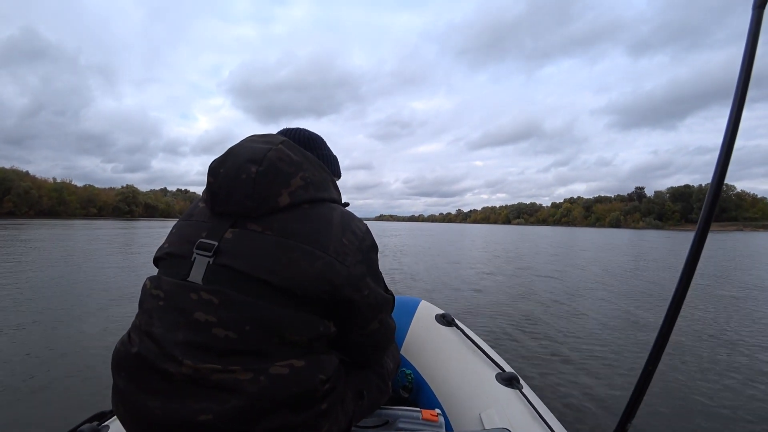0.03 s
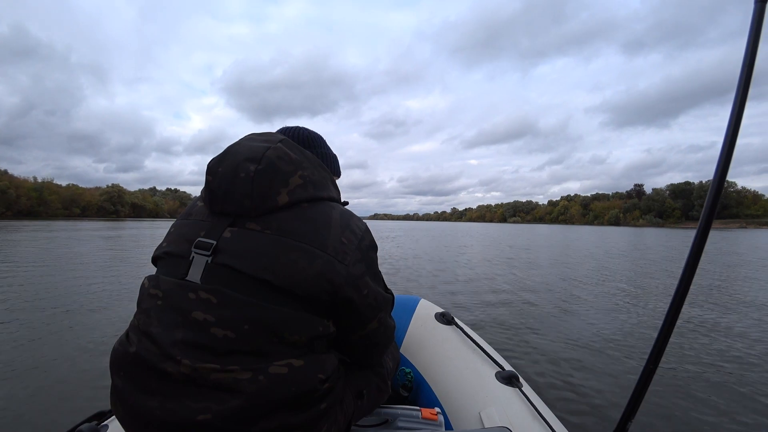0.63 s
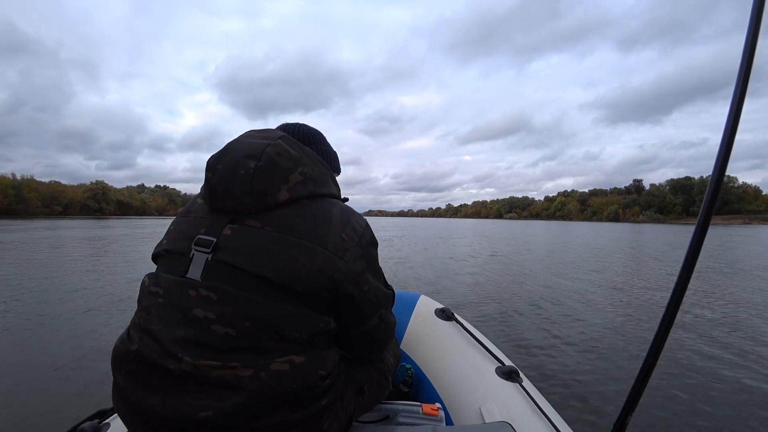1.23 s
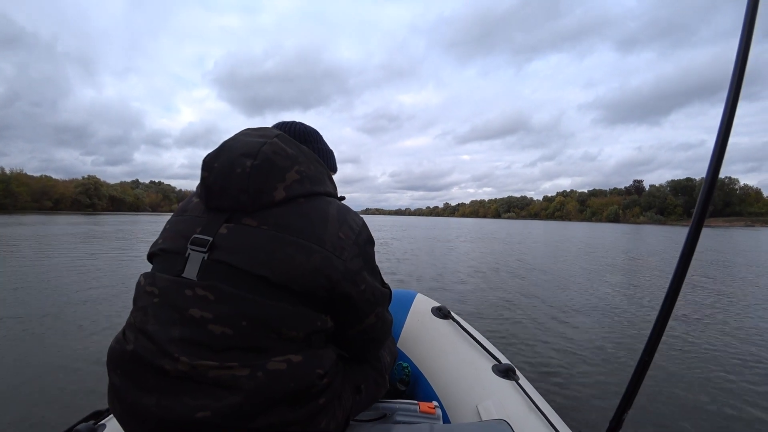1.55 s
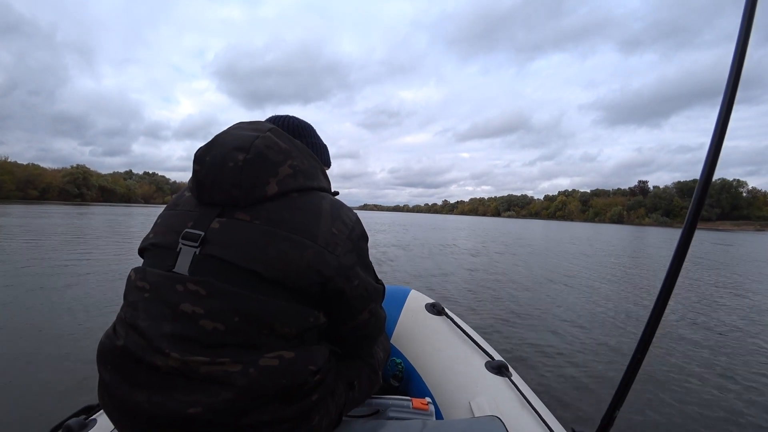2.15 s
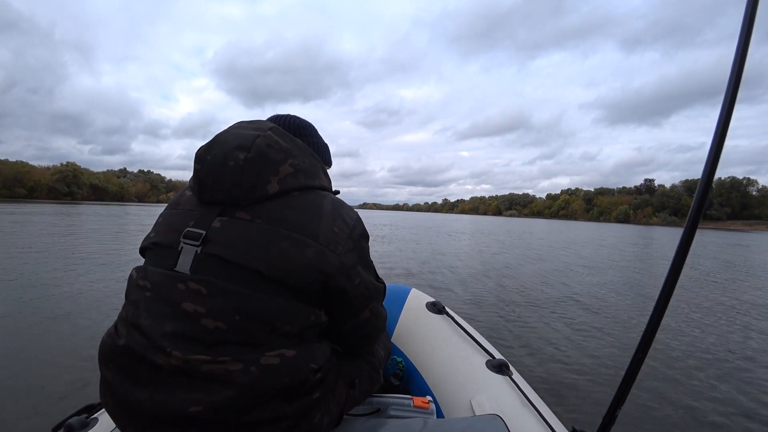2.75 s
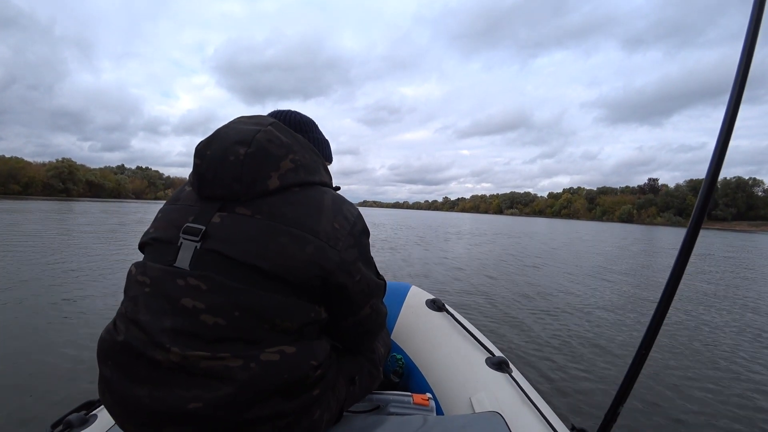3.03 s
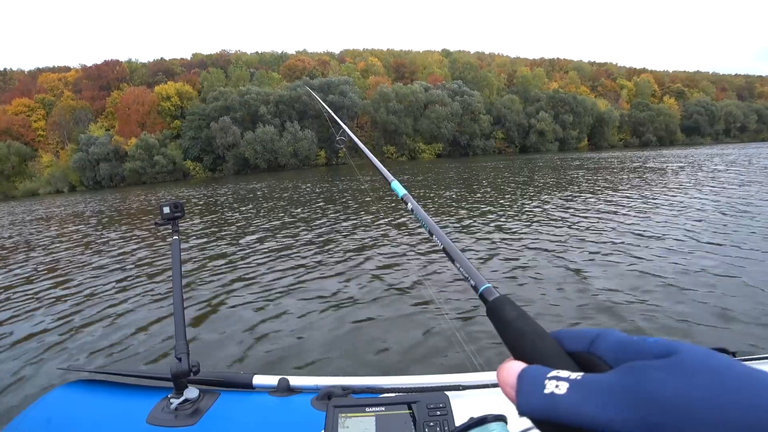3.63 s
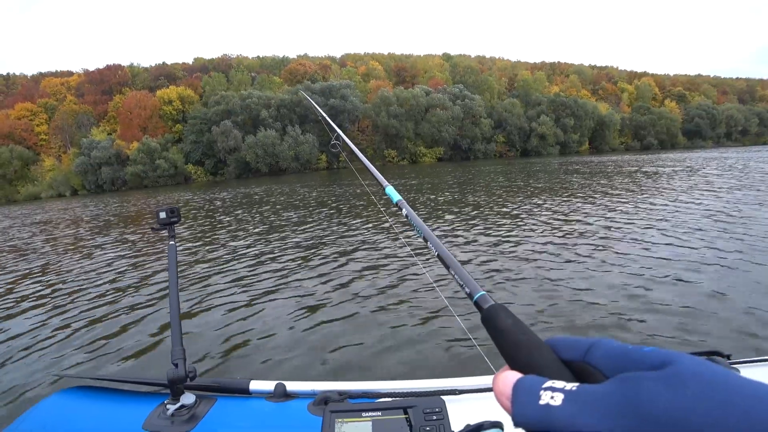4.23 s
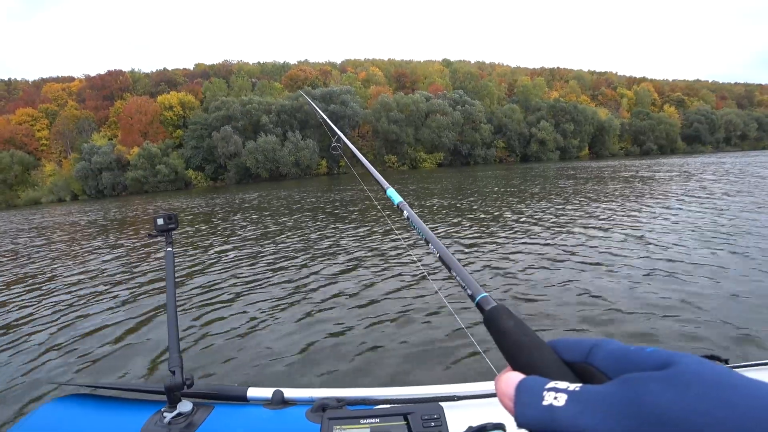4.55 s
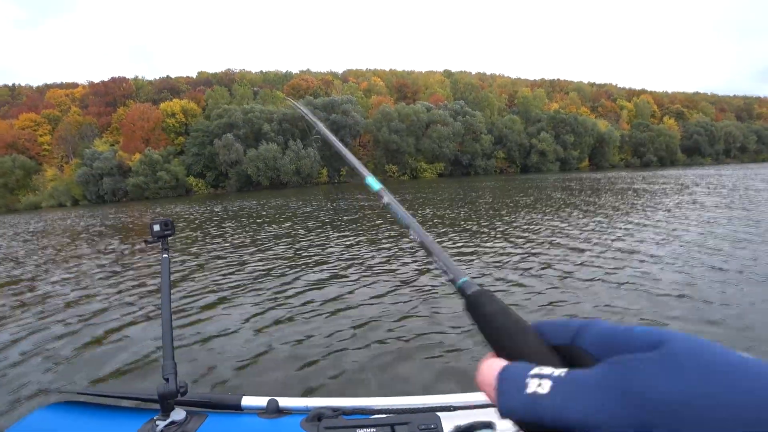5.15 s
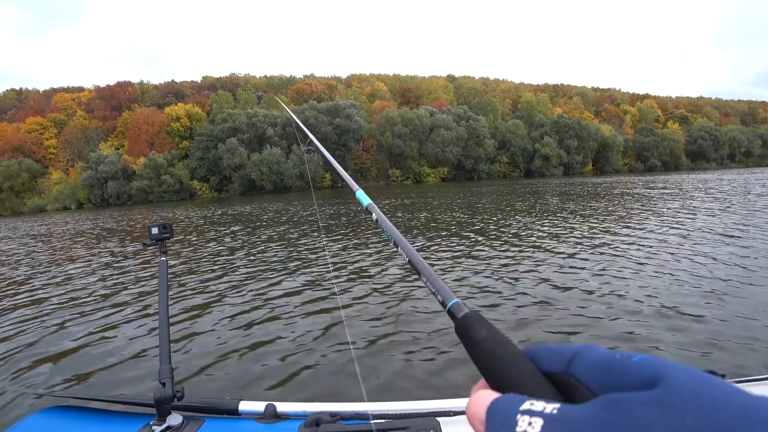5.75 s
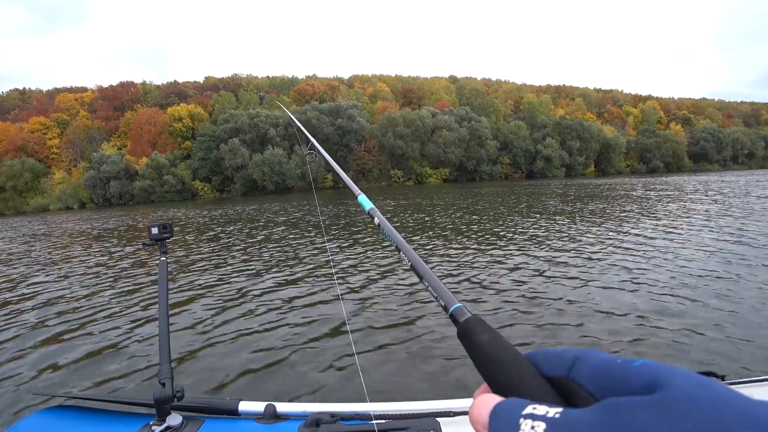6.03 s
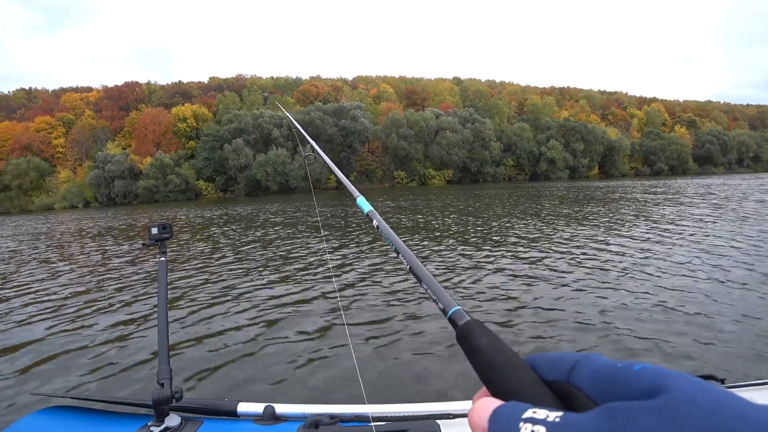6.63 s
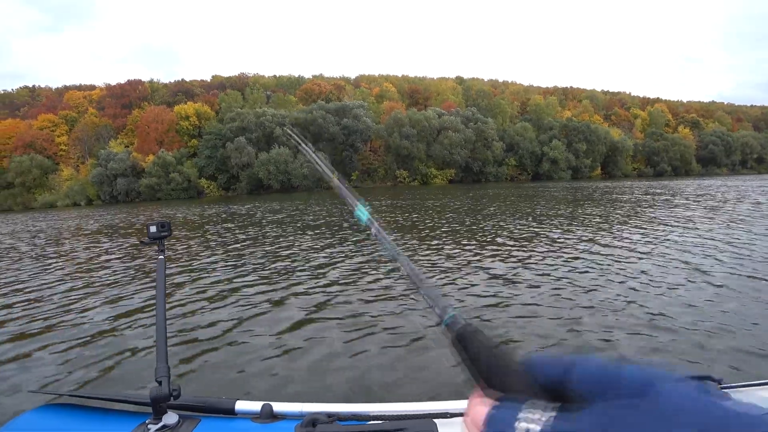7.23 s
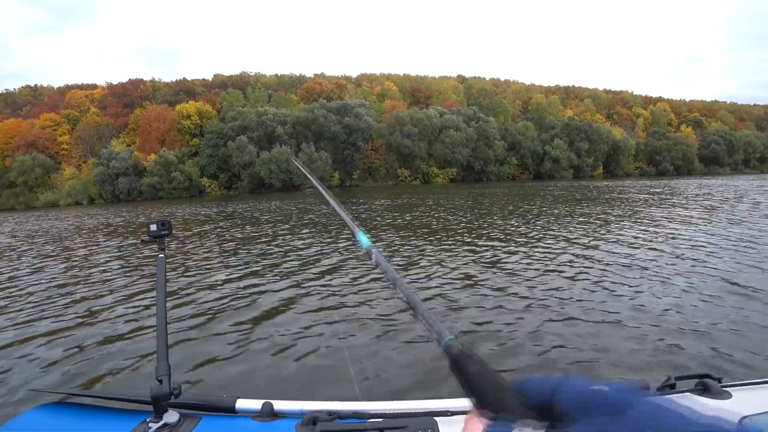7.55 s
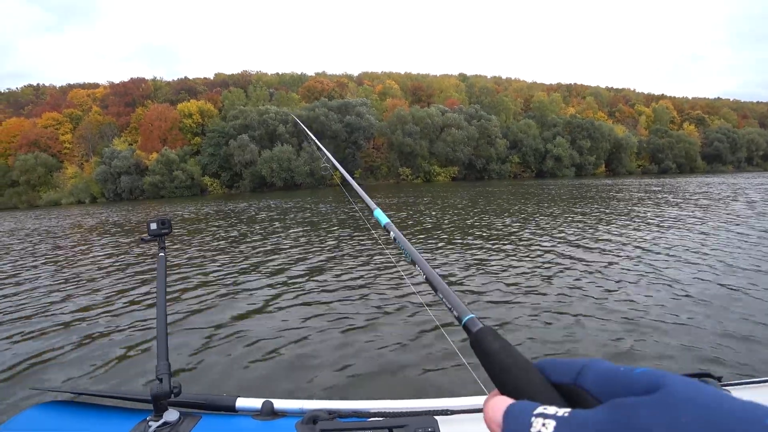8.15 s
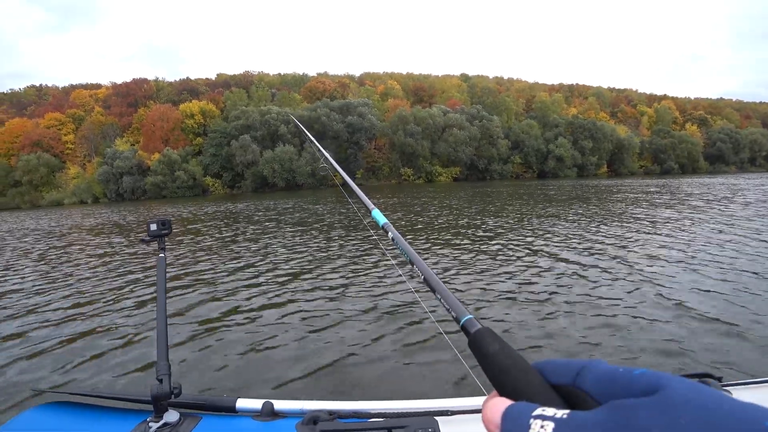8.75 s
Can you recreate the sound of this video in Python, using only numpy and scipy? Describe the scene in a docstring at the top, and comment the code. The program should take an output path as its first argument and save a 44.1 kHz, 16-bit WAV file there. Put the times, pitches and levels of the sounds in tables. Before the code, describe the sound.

Heard from aboard a small boat on a river, a motor holds an even, buzzing pitch amid rushing water and low wind rumble. A third of the way in, it drops away to light gusts and hollow little slaps of water on the hull. A nearby spinning reel whirrs three times, its line singing faintly and each turn of winding ending in a click. Soft sleeve rustle accompanies the last two bursts.

```python
"""First an outboard motor pushes an inflatable boat along a river at steady throttle: its periodic
firings make a harmonic drone over the rush of the wake, while turbulent wind buffets the microphone.
Just after 3 s the drone fades quickly into a quiet drift, where gusts come and go and ripples slap the
hull, ringing pockets of trapped air. From the fade on, a spinning reel is cranked in three bursts:
friction makes it whirr and the line sing, and an impact clicks at each stop. A sleeve brushes along
with the last two bursts, and a faint bird calls just before the third."""
import sys
import numpy as np
from scipy import signal
from scipy.fft import rfft, irfft
from scipy.io import wavfile

SR = 44100
rng = np.random.default_rng(int(sys.argv[2]) if len(sys.argv) > 2 else 0)


def master(y):
    """Save y as 16-bit WAV."""
    cut = np.clip(np.atleast_2d(y).T, -1, 1)
    pcm = np.round(cut * 32767)  # scale
    wavfile.write(sys.argv[1], SR, pcm.astype(np.int16))


N = 396900
TIME = np.arange(N) / SR
RIDE_END_S, RIDE_FADE_S = 3.358, 0.12

# Spectra give shape only; correlation is between the left and right channels.
# open river and microphone hiss: frequency_hz, density_db
RIVER_SPECTRUM = [(40, 1), (200, 2), (400, -2.5), (700, -3), (1300, -7.5), (2000, -7.5), (2900, -13),
                  (3700, -10.5), (4300, -14), (5200, -13), (7500, -17), (9500, -19), (10800, -23),
                  (15700, -25)]
# stereo image of the river: frequency_hz, correlation
RIVER_CORRELATION = [(60, 0.99), (130, 1), (290, 0.63), (640, -0.43), (1410, -0.61), (3100, 0.37),
                     (6820, 0.86), (15000, 0.24)]
# water churning under the hull: frequency_hz, density_db
CHURN_SPECTRUM = [(40, -6), (140, 6), (230, -2), (400, -15), (700, -31), (1500, -42), (4000, -73)]
# waves washing under the hull: peak_s, level_db, half_length_s
HULL_WAVES = [(3.59, -36, 0.063), (3.72, -45, 0.1), (4.0, -37, 0.05), (4.15, -43, 0.052), (5.0, -45, 0.064),
              (5.48, -50, 0.016), (6.98, -49, 0.018), (7.68, -54, 0.034), (7.985, -45, 0.02)]
# steady airflow, strong under way and dying down adrift: time_s, level_db
BREEZE_LEVELS = [(0, -39), (0.45, -40), (1.27, -33), (1.36, -25), (3.1, -28.5), (3.4, -42.5), (5.3, -49.5),
                 (6.5, -47.5), (7.1, -53.5), (9.0, -52)]
# gusts on top of the breeze: peak_s, level_db, half_length_s
GUST_SWELLS = [(0.06, -27, 0.042), (0.23, -32, 0.067), (0.55, -34, 0.03), (0.82, -26.5, 0.046),
               (0.96, -31, 0.05), (1.38, -25, 0.036), (1.62, -25, 0.033), (1.99, -23, 0.014),
               (2.25, -27.5, 0.13), (2.53, -26, 0.022), (2.69, -22.5, 0.057), (2.84, -17, 0.022),
               (2.98, -25, 0.036), (3.27, -21.5, 0.033), (3.58, -33, 0.032), (3.75, -42.5, 0.08),
               (4.0, -42, 0.11), (4.2, -45, 0.06), (4.64, -50, 0.062), (4.95, -36, 0.06),
               (5.16, -42, 0.027), (5.52, -46, 0.04), (7.67, -43, 0.042)]
# wind buffeting: frequency_hz, density_db
WIND_SPECTRUM = [(10, -17.5), (25, 4.5), (48, 0), (75, 0), (110, -11), (200, -22.5), (400, -44),
                 (1000, -88)]
# turbulence at the microphone ports: frequency_hz, density_db
EDDY_SPECTRUM = [(20, -22), (60, -4), (120, 0), (190, 1), (300, -2), (500, -10), (800, -19.5), (1300, -37),
                 (2200, -49), (5000, -68)]
# single hard puffs on the ports: peak_s, level_db
PORT_PUFFS = [(1.392, -14), (2.529, 0), (2.707, -10), (2.857, -2)]
# ripples slapping the hull: start_s, level_db, pitch_hz, attack_s, relative_splash_db
HULL_SLAPS = [(3.524, -30.5, 260, 0.0026, -22), (3.642, -39.5, 298, 0.0024, -4),
              (3.678, -26.5, 326, 0.0015, -11.5), (3.683, -51, 856, 0.0028, -12),
              (3.739, -40, 200, .003, -23), (3.976, -30, 190, 0.0019, -25), (4.03, -40, 197, 0.002, -22),
              (4.113, -42, 800, .002, -5), (4.166, -23, 310, 0.0016, -26), (4.234, -25.5, 110, 0.0024, -33),
              (4.285, -23.5, 65, 0.0027, -43), (4.553, -34.5, 169, 0.0029, -22),
              (4.799, -35.5, 390, 0.0023, -19), (4.953, -28.5, 324, 0.0018, -26),
              (4.984, -33, 190, 0.0026, -29), (5.036, -34.5, 250, 0.0024, -24),
              (6.048, -28.5, 310, 0.0015, -16.5), (6.518, -35, 310, 0.0034, -9.5),
              (6.524, -42, 775, 0.0034, -14), (6.682, -49, 128, 0.0051, -28),
              (6.972, -30, 298, 0.0024, -16), (6.981, -26.5, 340, 0.0019, -28),
              (7.9317, -29.5, 286, 0.0018, -20), (7.9738, -24, 386, 0.0022, -14),
              (7.991, -35, 328, 0.0015, -28), (8.399, -44.5, 416, 0.003, -9),
              (8.915, -40, 370, 0.0025, -23), (8.947, -31, 219, 0.0017, -22)]
# spatter after a slap: frequency_hz, density_db
SPLASH_SPECTRUM = [(100, 2), (400, -1), (850, 0.5), (1400, -16), (2600, -18), (8000, -48)]
# sleeve brushing past with the crank: peak_s, level_db, half_length_s
SLEEVE_BRUSHES = [(4.857, -43, 0.054), (5.291, -40, 0.018), (6.999, -42.5, 0.05), (7.454, -42.5, 0.014)]
# sliding cloth: frequency_hz, density_db
SLEEVE_SPECTRUM = [(150, 4.5), (800, 1.5), (1800, -4.5), (3500, 3), (5000, -1), (7500, -2), (11000, -6),
                   (13000, -11), (15700, -24)]
# impacts in the reel's mechanism: start_s, level_db, pitch_ratio
REEL_CLICKS = [(3.5144, -20.5, 1.07), (4.7312, -22, 1.25), (5.108, -33, 1.6), (5.604, -22, 0.98),
               (6.872, -30, 1.02), (7.152, -34, 2.05), (7.347, -33, 1.2), (7.761, -19, 1.12)]
# modes of the clicking part: base_frequency_hz, level_db, t60_s
IMPACT_MODES = [(3500, -14, 0.0028), (4300, 0.5, 0.0038), (4850, 12, 0.0013), (7540, -7.5, .004),
                (11000, -6.5, 0.0061)]
# pushes on the crank: fastest_s, half_length_s, line_pitch_hz, line_base_db
CRANK_STROKES = [(3.395, 0.13, 4080, -57.5), (5.1, 0.16, 3940, -53.5), (5.476, 0.14, 3720, -54),
                 (7.082, 0.052, 2540, -62), (7.245, 0.184, 3650, -58), (7.387, 0.16, 3280, -66),
                 (7.62, 0.16, 3570, -59.5)]
# resonances at which the taut line squeals: pitch_hz, width_hz, boost_db
LINE_SQUEALS = [(2420, 200, 11), (3255, 230, 13.5), (3590, 100, 4.5), (4000, 30, 14)]
# bursts of reeling in: start_s, stop_s, rotor_db
REEL_BURSTS = [(3.19, 3.524, -50.5), (4.816, 5.61, -50), (6.9, 7.77, -50.5)]
# rubbing of gears and line: frequency_hz, density_db
WHIRR_SPECTRUM = [(150, -3), (800, -0.5), (1800, -6), (2500, -2.5), (2950, -6), (3400, -9.5), (4500, 0.5),
                  (5700, -9.5), (6500, -2), (7600, -1.5), (8500, -10), (10500, -12), (13000, -23),
                  (15700, -36)]
# modes of rod and spool: frequency_hz, width_hz, level_db
ROD_SPOOL_MODES = [(2510, 260, -0.5), (3280, 77, 2), (3580, 180, -15), (3850, 180, -6), (4440, 250, -2.5),
                   (7680, 100, -2.5)]
# small ticks in the reel: frequency_hz, density_db
TICK_SPECTRUM = [(1000, -12), (4000, 2), (9000, -2), (12500, -7), (15700, -11)]
# spray and machine noise under way: frequency_hz, density_db
WAKE_SPECTRUM = [(40, -41.5), (130, 2.5), (280, -2.5), (450, -4), (620, -8.5), (900, -14), (1300, -19.5),
                 (2400, -23), (2900, -27.5), (4300, -27), (7500, -30.5), (10300, -34.5), (13000, -43),
                 (15700, -51)]
# stereo image of the wake: frequency_hz, correlation
WAKE_CORRELATION = [(60, 0.44), (130, 1), (290, 0.59), (640, 0.47), (1410, 0.069), (3100, 1), (6820, 0.85),
                    (15000, 0.063)]
# rattle of the powerhead: frequency_hz, density_db
RATTLE_SPECTRUM = [(400, 17.5), (900, 5), (2500, 8.0), (4000, -9.0), (9000, -15), (15000, -35)]
# speed of the motor: time_s, firing_rate_hz
FIRING_RATE = [(0, 91.4), (0.5, 91.6), (1.2, 91.65), (2.0, 91.55), (2.7, 91.45), (3.0, 91.6), (3.35, 91.6)]
# harmonics of exhaust and crankcase: multiple_of_firing_rate, relative_level_db
ENGINE_ORDERS = [(1, -9.5), (2, 2), (3, -1), (4, -7), (5, -11), (6, -13), (7, -27.5), (8, -24.5), (9, -22),
                 (10, -21), (11, -43), (12, -31.5), (13, -32), (14, -48), (15, -35), (16, -38), (17, -41.5),
                 (18, -32), (19, -56.5), (20, -33), (21, -73), (22, -50), (23, -57), (24, -38.5), (25, -36),
                 (26, -39), (27, -34), (28, -35), (29, -52), (30, -44), (31, -51), (32, -42), (33, -39),
                 (34, -36.5), (35, -57), (36, -47.5), (37, -62), (38, -44.5), (39, -62), (40, -55),
                 (41, -50), (42, -39.5), (43, -51), (44, -44), (45, -42)]
# excess of the exhaust at the left port: frequency_hz, left_minus_right_db
EXHAUST_BALANCE = [(90, 1), (360, 1.3), (550, 5.5), (900, 2), (1200, 5.5), (2500, 2)]


def amp(db):
    """Amplitude ratio of a level in decibels."""
    return 10 ** (np.asarray(db) / 20)


def unit_rms(x):
    """Normalisation to unit power."""
    return x / np.sqrt(np.mean(x ** 2) + 1e-20)


def at_frequency(points, hz):
    """Interpolation on a logarithmic frequency axis."""
    frequency, value = np.transpose(points)
    return np.interp(np.log(hz + 1), np.log(frequency + 1), value)


def add(mix, start_s, sound):
    """Superposition of a sound on the mix."""
    part = mix[..., round(start_s * SR):][..., :sound.shape[-1]]
    part += sound[..., :part.shape[-1]]


def pan(left_minus_right_db):
    """Direction as a level difference between channels."""
    return amp(np.array([[left_minus_right_db], [-left_minus_right_db]]) / 2)


def wander(rate_hz):
    """Random modulation: low-passed noise of rms 1."""
    count = N // 64
    hz = np.fft.rfftfreq(count, N / count / SR)
    slow = irfft(rfft(rng.standard_normal(count)) / (1 + (hz / rate_hz) ** 2), count)
    return np.interp(TIME, np.linspace(0, N / SR, count), unit_rms(slow))


def noise(spectrum, correlation):
    """Partially coherent stereo noise; the correlation is a number or a table."""
    hz = np.fft.rfftfreq(N, 1 / SR)
    alike = np.clip(correlation if np.isscalar(correlation) else at_frequency(correlation, hz), -1, 1)
    mid, side = rfft(rng.standard_normal((2, N))) * amp(at_frequency(spectrum, hz))
    mid, side = irfft(mid * np.sqrt(1 + alike), N), irfft(side * np.sqrt(1 - alike), N)
    return np.array([mid + side, mid - side]) / mid.std()


def resonate(x, hz, width_hz):
    """Forced response of a damped resonator of gain 1, whose frequency may glide."""
    carrier = np.exp(2j * np.pi * np.cumsum(hz * np.ones(len(x))) / SR)
    pole = np.exp(-np.pi * width_hz / SR)
    return 2 * (carrier * signal.lfilter([1 - pole], [1, -pole], x / carrier)).real


def swells(rows):
    """A sum of Gaussian envelopes from rows of peak_s, level_db, half_length_s."""
    return sum(amp(db) * np.exp(-np.minimum(((TIME - peak_s) / half_s) ** 2 / 2, 50))
               for peak_s, db, half_s in rows)


def under_way():
    """Envelope of the ride: 1, then a linear fade to 0."""
    return np.clip((RIDE_END_S - TIME) / RIDE_FADE_S, 0, 1)


def far_bird(start_s=6.68, length_s=0.19, low_hz=1405, high_hz=1535):
    """Amplitude modulation parts a faint rising tone into a two-syllable call from the bank."""
    hz = np.interp(TIME, [start_s, start_s + length_s], [low_hz, high_hz]) * (1 + .012 * wander(130))
    syllables = swells([(6.72, -64, 0.025), (6.85, -63, 0.012)])
    return syllables * np.sqrt(2) * np.sin(2 * np.pi * np.cumsum(hz) / SR)


def river(river_db=-57, churn_db=-3, gurgle_db=3, idle_db=-72, stir_db=-22, stir_s=0.0093):
    """Flow noise: open water washes, and waves and slaps add in power to churn under the hull."""
    wash = amp(river_db) * noise(RIVER_SPECTRUM, RIVER_CORRELATION) * amp(0.16 * wander(1.7))
    stirred, age = np.zeros(N), np.arange(SR // 8) / SR / stir_s
    for start_s, db, *_ in HULL_SLAPS:
        add(stirred, start_s, amp(db + stir_db) * age * np.exp(1 - age))
    unrest = np.sqrt(amp(idle_db) ** 2 + swells(HULL_WAVES) ** 2 + stirred ** 2)
    churn = amp(churn_db) * unrest * noise(CHURN_SPECTRUM, 0.2) * amp(gurgle_db * wander(28))
    return wash + churn


def airflow():
    """Wind strength at the microphone: gusts superposed on a mean flow."""
    return amp(np.interp(TIME, *np.transpose(BREEZE_LEVELS))) + swells(GUST_SWELLS)


def wind(air, gain_db=-1, lump_db=2):
    """Low pressure fluctuations scale with the airflow, leaning to the right port at speed."""
    riding = under_way() * noise(WIND_SPECTRUM, 1.0) * pan(-2.6)
    adrift = (1 - under_way()) * noise(WIND_SPECTRUM, 0.97)
    return amp(gain_db) * air * (riding + adrift) * amp(lump_db * wander(12))


def eddies(air, eddy_db=-19.5, reference_air_db=-24, exponent=1.47, puff_s=0.0013):
    """Turbulence at speed drives the two ports in antiphase and grows as a power of the airflow."""
    lumps = amp(1.5 * wander(70))
    strength = under_way() * (air / amp(reference_air_db)) ** exponent
    swirl = amp(eddy_db) * strength * unit_rms(noise(EDDY_SPECTRUM, 0)[0] * lumps)
    for peak_s, db in PORT_PUFFS:
        offset = (TIME - peak_s) / puff_s
        swirl -= amp(db) * (1 - offset ** 2) * np.exp(-offset ** 2 / 2)
    return swirl * [[1], [-1]]


def hull_slaps(chirp_per_s=0.43, splash_s=0.013, spread_rad=0.13, push_db=-14, push_s=0.00065):
    """Air-pocket resonance: each ripple pushes the hull, traps air that rings briefly, and spatters."""
    out, t = np.zeros((2, N)), np.arange(SR // 8) / SR
    spatter = noise(SPLASH_SPECTRUM, 0.67) * amp(4.0 * wander(120))
    push = amp(push_db) * t / push_s * (2 - t / push_s) * np.exp(1 - t / push_s)
    for start_s, db, hz, attack_s, splash_db in HULL_SLAPS:
        closing = 1 - np.exp(-(2 * hz * t) ** 2)  # the water closes softly, which keeps the plop dull
        envelope = t / attack_s * np.exp(1 - t / attack_s) * closing
        phase = 2 * np.pi * hz * t * (1 + chirp_per_s * t)
        ring = envelope * np.sin(phase + [[spread_rad], [-spread_rad]])
        onset = 1 - np.exp(-t / attack_s)
        add(out, start_s, amp(db) * (ring - push * onset))
        spray = spatter[:, round(start_s * SR):][:, :len(t)]
        spray_envelope = (np.exp(-t / splash_s) * onset)[:spray.shape[1]]
        add(out, start_s, amp(db + splash_db) * spray * spray_envelope)
    return out * pan(0.39)


def sleeve(grain_db=2.0):
    """Sliding friction of cloth on cloth gives short swells of grainy noise."""
    return swells(SLEEVE_BRUSHES) * noise(SLEEVE_SPECTRUM, 0.94) * amp(grain_db * wander(300)) * pan(-0.92)


def clicks(attack_s=0.00011, rebound_s=.0011, rebound_db=-10):
    """Impact excites the damped modes of a small hard part, which hits its stop and rebounds once."""
    out, t = np.zeros(N), np.arange(SR // 30) / SR
    for start_s, db, pitch_ratio in REEL_CLICKS:
        # the strike shifts the low modes; the top one belongs to the part itself
        ratios = [pitch_ratio] * (len(IMPACT_MODES) - 1) + [1]
        ring = sum(amp(mode_db - 60 * t / t60_s) * np.sin(2 * np.pi * hz * ratio * t)
                   for (hz, mode_db, t60_s), ratio in zip(IMPACT_MODES, ratios))
        ring *= 1 - np.exp(-t / attack_s)
        ring /= abs(ring).max()
        add(out, start_s, amp(db) * ring)
        add(out, start_s + rebound_s, amp(db + rebound_db) * ring)
    return out * pan(-4.0)


def crank_stroke(fastest_s, half_s, top_hz, sag=0.41):
    """Pitch follows a parabolic arch of crank speed: gives sample mask, progress (-1 to 1) and pitch."""
    active = abs(TIME - fastest_s) < half_s
    progress = (TIME[active] - fastest_s) / half_s
    return active, progress, top_hz * (1 - sag * progress ** 2)


def singing_line(width_hz=120, octave_db=-13, slack_db=-30, edge_share=0.11, stutter_db=4, lock=0.7):
    """Friction makes the line sing with the crank, loudest when taut and locked on to a resonance."""
    out = np.zeros(N)
    rub, stutter = rng.standard_normal(N), amp(stutter_db * wander(35))
    for fastest_s, half_s, top_hz, db in CRANK_STROKES:
        active, progress, free_hz = crank_stroke(fastest_s, half_s, top_hz)
        pull_hz = sum((centre - free_hz) * np.exp(-((free_hz - centre) / width) ** 2 / 2)
                      for centre, width, _ in LINE_SQUEALS)
        hz = free_hz + lock * pull_hz
        song = unit_rms(resonate(resonate(rub[active], hz, width_hz), hz, 2 * width_hz))
        octave = amp(octave_db) * unit_rms(resonate(rub[active], 2 * hz, 2 * width_hz))
        squeal_db = sum(boost / (1 + (2 * (hz - centre) / width) ** 2)
                        for centre, width, boost in LINE_SQUEALS)
        fade = np.minimum((1 - abs(progress)) / edge_share, 1)
        gain = amp(db + squeal_db + slack_db * np.maximum(-progress, 0)) * (hz / top_hz) ** 2
        out[active] += gain * fade * unit_rms(stutter[active]) * (song + octave)
    return out * pan(-5.5)


def rotor_envelope(coast_hz=2700, full_hz=3600, exponent=0.87, spin_up_s=0.21, run_down_s=0.06):
    """Amplitude is a power of speed: the rotor spins up, swells with each push and runs down."""
    pitch_hz = np.full(N, float(coast_hz))  # the line's pitch stands for the speed
    for fastest_s, half_s, top_hz, _ in CRANK_STROKES:
        active, _, hz = crank_stroke(fastest_s, half_s, top_hz)
        pitch_hz[active] = np.maximum(pitch_hz[active], hz)
    turning = np.zeros(N)
    for start_s, stop_s, db in REEL_BURSTS:
        spin_up = np.clip((TIME - start_s) / spin_up_s, 0, 1)
        turning += amp(db) * spin_up * np.exp(-np.maximum(TIME - stop_s, 0) / run_down_s)
    return turning * (pitch_hz / full_hz) ** exponent


def reel(whirr_db=-1, ring_db=-4, grain_db=2, patchy_db=3, ticks_per_s=150, tick_db=-11, tick_s=0.00042):
    """Forced vibration: gears and line rub and tick, ringing the modes of rod and spool unevenly."""
    rub = rng.standard_normal(N)
    ring = unit_rms(sum(amp(db + patchy_db * wander(22)) * resonate(rub, hz, width_hz)
                        for hz, width_hz, db in ROD_SPOOL_MODES))
    whirr = amp(whirr_db) * noise(WHIRR_SPECTRUM, 0.86) + amp(ring_db) * ring
    whirr *= amp(grain_db * wander(250))
    catches = (rng.random(N) < ticks_per_s / SR) * amp(6 * np.minimum(rng.exponential(1, N), 3))
    tick_envelope = unit_rms(signal.lfilter([1], [1, -np.exp(-1 / (tick_s * SR))], catches))
    ticks = amp(tick_db) * tick_envelope * noise(TICK_SPECTRUM, 0.37)
    return (whirr + ticks) * rotor_envelope() * pan(-1.9)


def hum(pitch_hz=316, width_hz=7, gain_db=-39):
    """Narrow-band noise is heard as a faint unsteady hum between the firing orders."""
    tone = resonate(resonate(rng.standard_normal(N), pitch_hz, width_hz), pitch_hz, 3 * width_hz)
    return amp(gain_db) * unit_rms(tone) * under_way() * pan(1.5)


def exhaust(firings, drone_db=-18, jitter_cycles=0.00083, flutter=0.011, left_lag_s=0.00033,
            max_lag_rad=1.09, whine_db=-44):
    """Fourier synthesis of one pulse per firing; the higher orders flutter more, and faster."""
    orders, levels_db = np.transpose(ENGINE_ORDERS)
    # minimum phase: the pulse rings after the firing, never before it
    log_gain = np.log(amp(np.r_[levels_db[-1], levels_db, levels_db[-2::-1]]))
    phases = -signal.hilbert(log_gain).imag[1:]
    firings = firings + jitter_cycles * wander(30)
    drone = np.zeros((2, N))
    for order, gain, phase in zip(orders, amp(levels_db), phases):
        hz = order * FIRING_RATE[0][1]
        depth, flutter_hz = min(flutter * (1 + order), .6), 6 + .7 * order
        angle = 2 * np.pi * order * firings + phase + depth * wander(flutter_hz)
        # the motor sits off to one side, so its low orders reach the ports out of step
        half_lag = min(2 * np.pi * hz * left_lag_s, max_lag_rad) / 2
        tone = np.cos(angle + [[-half_lag], [half_lag]]) * pan(at_frequency(EXHAUST_BALANCE, hz))
        drone -= gain * (1 + depth * wander(flutter_hz)) * tone
    # one high order reaches the two ports in antiphase
    whine = np.sin(2 * np.pi * 15 * firings) * [[1], [-1]] * amp(1.6 * wander(6.4))
    return np.sqrt(2) * (amp(drone_db) * drone + amp(whine_db) * whine)


def outboard(wake_db=-26, rattle_decay_cycles=0.5, rattle_db=-45, seethe_db=1.16):
    """Periodic excitation: each firing pulses the exhaust and rattles the powerhead, over the wake."""
    firings = np.cumsum(np.interp(TIME, *np.transpose(FIRING_RATE))) / SR
    knock = unit_rms(np.exp(-(firings % 1) / rattle_decay_cycles))
    rattle = amp(rattle_db) * noise(RATTLE_SPECTRUM, 0.65) * knock
    wake = amp(wake_db) * noise(WAKE_SPECTRUM, WAKE_CORRELATION) * amp(seethe_db * wander(32))
    return under_way() * (exhaust(firings) + (wake + rattle) * pan(1.8))


def scene(start_gain_db=0.46, ease_db_per_s=-0.28):
    """Superposition of all sources: the ride, its drone easing very slightly, then the drift."""
    air = airflow()
    ride = (outboard() + hum()) * amp(start_gain_db + ease_db_per_s * TIME) + eddies(air)
    fishing = reel() + singing_line() + sleeve() + clicks()
    return ride + fishing + wind(air) + river() + hull_slaps() + far_bird()


def record(dry):
    """Soft saturation rounds off loud gusts below full scale; a low-pass filter then limits the band."""
    knee, cutoff_hz = 0.7, 15750
    excess = np.maximum(abs(dry) - knee, 0)
    rounded = np.clip(dry, -knee, knee) + np.sign(dry) * (1 - knee) * np.tanh(excess / (1 - knee))
    lowpass = signal.firwin(511, cutoff_hz, window=("kaiser", 9), fs=SR)
    return signal.oaconvolve(rounded, lowpass[None], "same", axes=1)


dry = scene()
out = record(dry)
master(out)
```